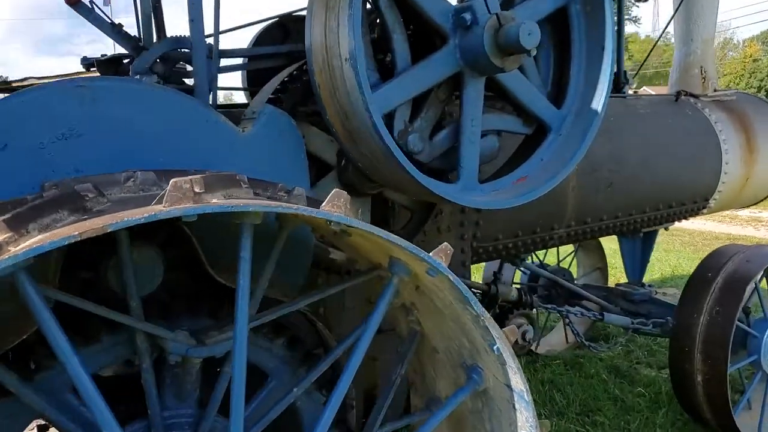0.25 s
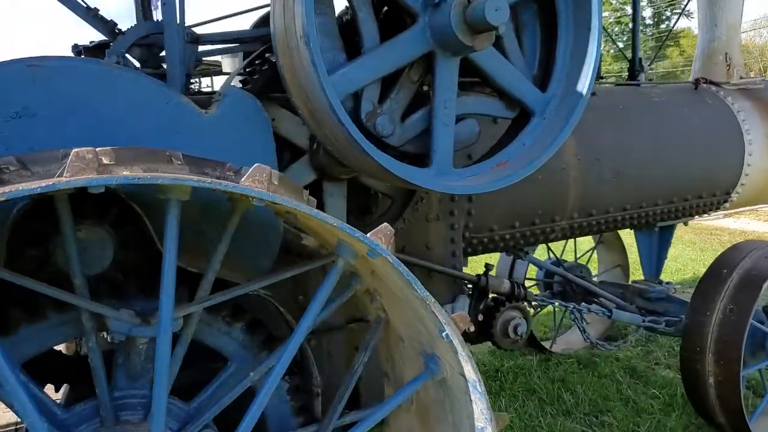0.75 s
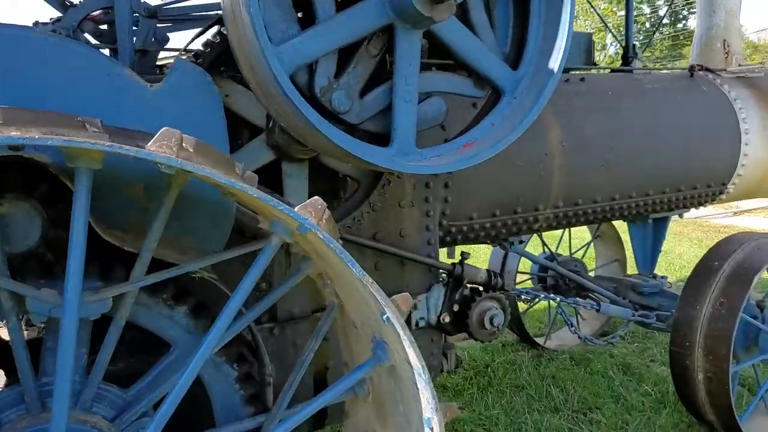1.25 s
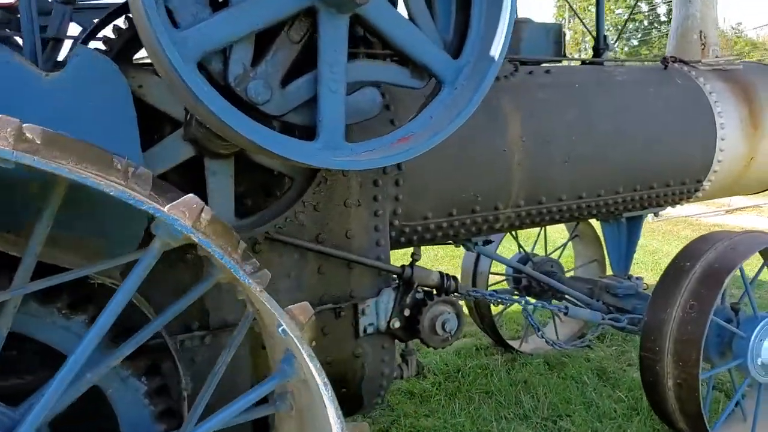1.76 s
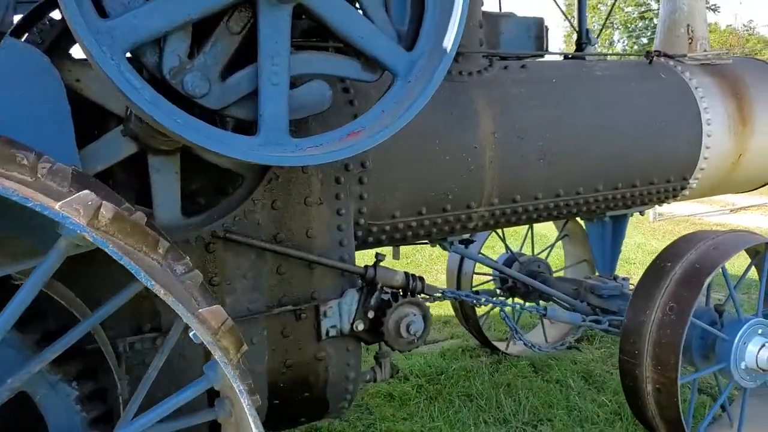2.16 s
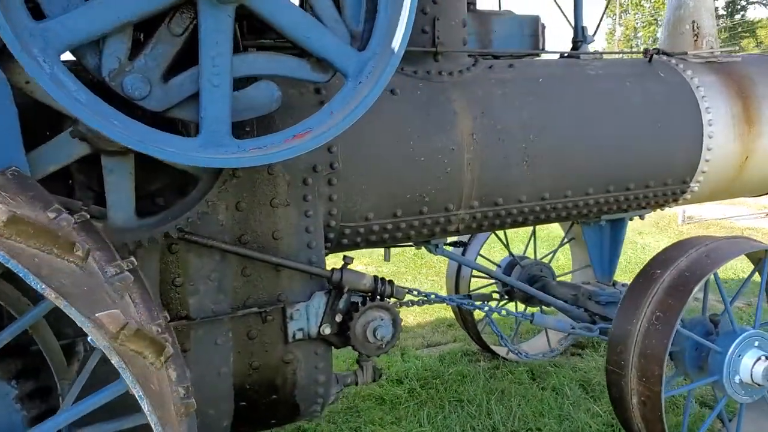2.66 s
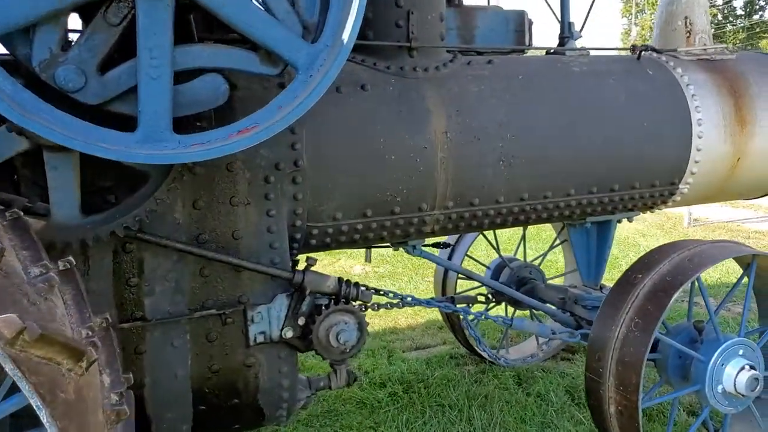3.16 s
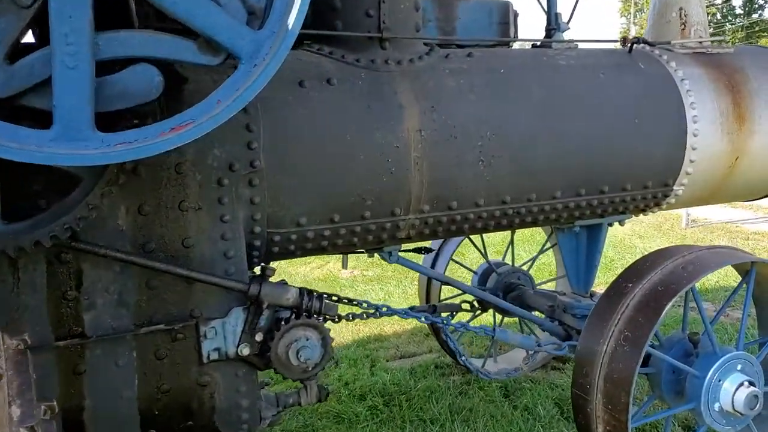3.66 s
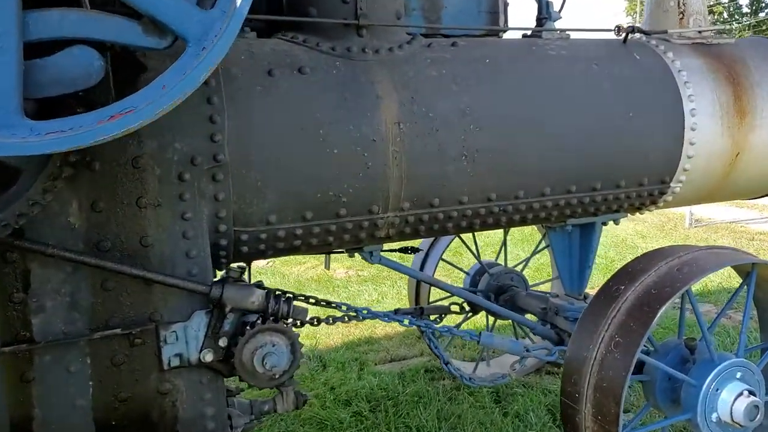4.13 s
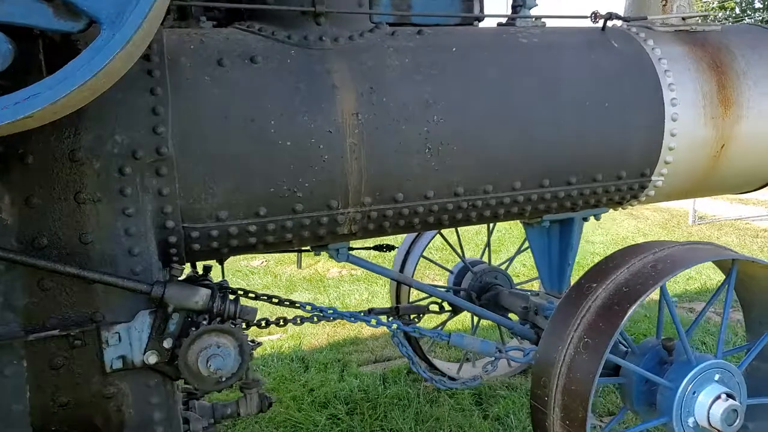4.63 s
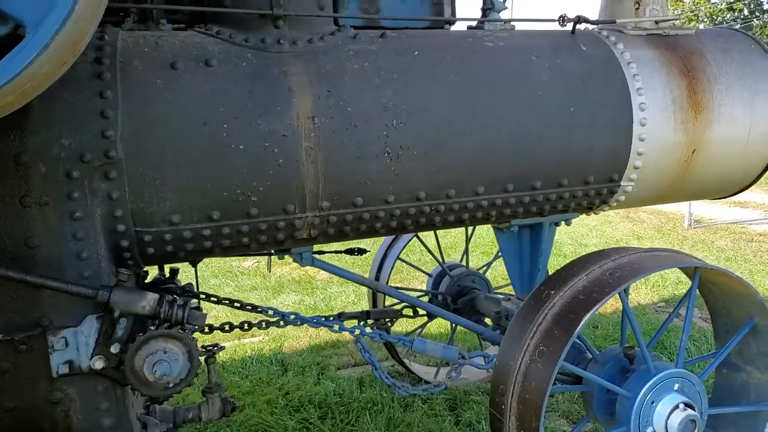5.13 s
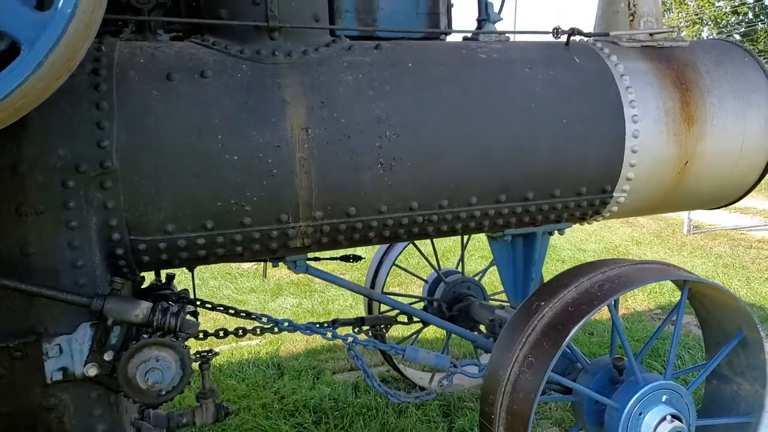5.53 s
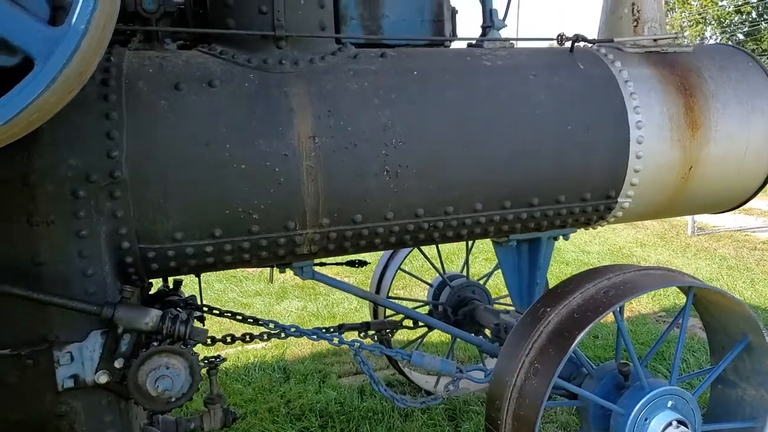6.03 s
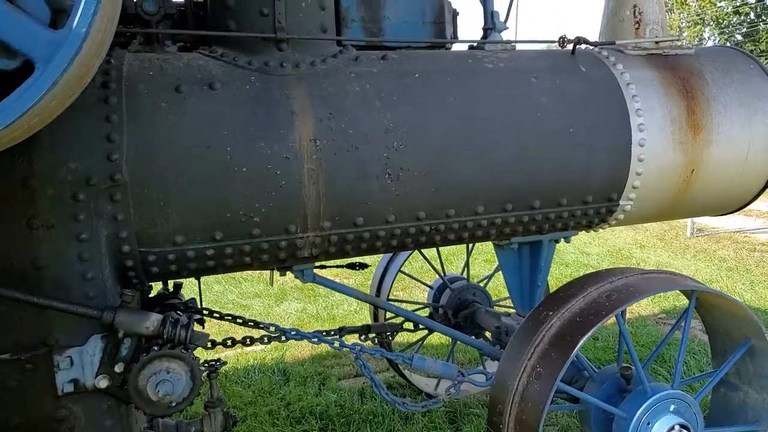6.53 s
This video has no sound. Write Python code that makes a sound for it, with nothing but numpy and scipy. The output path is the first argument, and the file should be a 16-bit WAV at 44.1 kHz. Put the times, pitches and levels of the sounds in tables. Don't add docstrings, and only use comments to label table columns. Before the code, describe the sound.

An open field in stereo, with a large twin-cylinder engine a little way off, near the centre. From 0 to 2 seconds it coasts, its deep uneven puffs slowing from about thirteen to ten cycles a second. On the left, small metal valves tick about eight times a second, dry hinge squeaks come near 0.2, 1.9, 3.7 and 5.5, and dull wooden knocks scatter until 2.0. Revs climb to a strong barking throb at 2.6, drop briefly at 2.9, surge again by 3.3, then ease slowly until 6.1 before a last climb to the end. From about 5 a cart closes from the right, its tyre roar peaking near 5.5 and brightening, with short wavering gear whines and stones snapping thickly after 6. Thin cricket chirps and high grasshopper scrapes lie over windy hiss and faint machinery murmur throughout.

```python
import sys
import numpy as np
from scipy import signal
from scipy.fft import rfft, irfft
from scipy.io import wavfile
from scipy.ndimage import uniform_filter1d

SR = 44100
rng = np.random.default_rng(int(sys.argv[2]) if len(sys.argv) > 2 else 0)


def materialize(psi):
    bounded = np.clip(np.atleast_2d(psi).T, -1, 1)
    quanta = np.round(bounded * 32767).astype(np.int16)
    wavfile.write(sys.argv[1], SR, quanta)


def voltage_ratio(level):
    return 10 ** (np.asarray(level, float) / 20)


N = 299439
EAR_LAG = 20


def curve(table):
    s, *columns = np.transpose(table)
    return [np.interp(np.arange(N) / SR, s, c, left=c[0], right=c[-1]) for c in columns]


def between(ends, share):
    return ends[0] + (ends[1] - ends[0]) * np.clip(share, 0, 1)


def unit(x):
    return x / np.sqrt(np.mean(x ** 2))


def steady(x):
    power = uniform_filter1d(uniform_filter1d(x ** 2, SR // 5), SR // 5)
    return x / np.sqrt(power)


def on_log(table, size):
    hz, value = np.transpose(table)
    return np.interp(np.log(np.arange(size // 2 + 1) * SR / size + 1), np.log(hz), value)


def colour(x, table):
    size = 2 ** 15
    cepstrum = irfft(np.log(voltage_ratio(on_log(table, size))))
    cepstrum[1:size // 2] *= 2
    cepstrum[size // 2 + 1:] = 0
    response = irfft(np.exp(rfft(cepstrum)))[:size // 4]
    return signal.fftconvolve(x, response)[:N]


def ring(x, hz, width):
    return signal.lfilter(*signal.iirpeak(min(hz, SR / 2.2), hz / width, SR), x)


def ring_twice(x, hz, width):
    return ring(ring(x, hz, width), hz, width)


def walk(rate):
    k = int(SR / rate)
    steps = np.repeat(rng.standard_normal(N // k + 1), k)
    return unit(uniform_filter1d(uniform_filter1d(steps, k), k)[:N])


def spikes(s, size):
    at = np.round(np.asarray(s) * SR).astype(int)
    return np.bincount(np.clip(at, 0, N - 1), size, N)


def swell(s, db, rise, fall):
    t = np.arange(int(8 * fall * SR)) / SR
    shape = (1 - np.exp(-t / rise)) * np.exp(-t / fall)
    return signal.fftconvolve(spikes(s, voltage_ratio(db)), shape / shape.max())[:N]


def burst(s, db, rise, fall):
    return swell(s, db, rise, fall) * rng.standard_normal(N)


def ports(x, pan_db, left, count=EAR_LAG):
    late = np.roll(x, count)
    return np.array([x, late] if left else [late, x]) * voltage_ratio(np.array([[pan_db], [-pan_db]]) / 2)


def flickering(table, own_db, shared_db):
    spectrum = rfft(colour(rng.standard_normal(N), table))
    octave = np.log2(np.arange(N // 2 + 1) * SR / N + 1)
    shared = shared_db * walk(6)
    out = 0
    for k in range(5, 15):
        band = irfft(spectrum * np.clip(1 - abs(octave - k), 0, 1), N)
        out = out + band * voltage_ratio(shared + own_db * walk(12))
    return unit(out)


# (frequency [Hz], level [dB])
EXHAUST_PIPE = [(20, -50), (40, -29), (58, 0.5), (80, 1), (110, 0), (135, -2.5), (165, -8), (210, -15.5),
                (240, -23.5), (290, -33.5), (400, -55), (700, -85)]


def through_pipe(pulses, size, f):
    late_s, late_hz, late_power = -.011, 220, 3.4
    turn_rad = 2 * np.pi * late_s * late_hz / late_power * np.minimum(f / late_hz, 2) ** late_power
    return irfft(rfft(pulses, size) * np.exp(-1j * turn_rad) * voltage_ratio(on_log(EXHAUST_PIPE, size)), size)[:N]


def pipe_drone(revs, cycles, climb, throttle, first_firing):
    drone_db = between((-9, -2), throttle) + between((0, -14), -climb / 15)
    drone = voltage_ratio(drone_db) * np.cos(2 * np.pi * 5 * (cycles - first_firing))
    since = (cycles - .067 + .5) % 1 - .5
    swing = np.cos(2 * np.pi * (12.5 * since + .85)) * 2 * np.cos(np.pi * since) ** 4
    return drone + voltage_ratio(between((-27.5, -9.5), (revs - 12) / 5.5)) * swing


# (time [s], cycles per second [Hz])
ENGINE_SPEED = [(0.0, 12.89), (0.17, 11.38), (0.8, 9.63), (1.36, 9.85), (1.5, 10.55), (1.77, 10.22),
                (2.14, 13.09), (2.47, 16.65), (2.64, 17.52), (2.91, 11.83), (3.27, 16.36), (4.02, 15.08),
                (4.37, 14.12), (4.82, 14.07), (5.68, 12.42), (6.07, 11.33), (6.53, 16.42), (6.79, 17.66)]
# (time [s], thump level [dB], throttle opening [0-1])
ENGINE_LOAD = [(0, -23, 0), (.2, -23.5, 0.2), (1.0, -26, 0), (1.3, -22, 0), (1.6, -22, 0.5),
               (2.0, -19, 0.1), (2.35, -16.5, 1), (2.68, -19.5, 0.6), (2.88, -24, 0.9), (3.05, -17, 0.43),
               (3.3, -16.5, 1), (3.55, -19.5, 1), (4.2, -19.5, 0.8), (4.95, -21.5, 1), (5.7, -22.5, 0.2),
               (6.05, -22.5, 0), (6.35, -17, 1), (6.79, -18, 0.8)]
# (share of the cycle [0-1], level [dB], sign [+1/-1])
PIPE_RETURNS = [
    (.2, -8.3, -1),
    (.655, -6.6, -1),
    (.755, -9, 1),
    (.801, -12.5, 1),
]
# (frequency [Hz], level [dB per Hz])
ROUGH_AIR_COLOUR = [(25, -50.5), (40, -11.5), (55, -10), (105, -6.5), (160, -12), (220, -19.5), (270, -41),
                    (400, -58.5)]
# (time [s], level against the puffs [dB])
ROUGH_AIR = [(0, 1), (1.15, 2), (1.4, -1), (2.0, -3), (2.3, -10), (2.6, -12), (2.68, 1), (2.9, 0),
             (3.0, -8), (3.2, -14), (4.1, -13), (4.8, -9), (5.1, -3), (5.6, -4), (6.0, -6), (6.79, -10)]
# (frequency [Hz], width [Hz], level [dB])
BARK_MODES = [
    (358, 41, -3.5),
    (410.5, 32, -5.5),
]
# (time [s], level against the puffs [dB])
TAILPIPE_RASP = [(0, -28), (2.0, -33), (2.5, -32), (2.8, -36.5), (3.9, -38), (4.2, -24.5), (4.9, -24.5),
                 (5.3, -31), (6.2, -30), (6.79, -35)]


def twin():
    first_firing, second_firing = .035, .404
    revs = curve(ENGINE_SPEED)[0]
    cycles = np.cumsum(revs) / SR
    thump_db, throttle = curve(ENGINE_LOAD)
    climb = uniform_filter1d(np.gradient(revs) * SR, SR // 10)
    growl_db = between((-6, -4.5), throttle) + 2.5 * np.tanh(climb / 8.6)
    growl_db = growl_db + between((0, 2), (13.4 - revs) / 2)
    bark_db = between((-38, -26.5), (revs - 12.7) / (15.8 - 12.7)) + between((0, -4), -climb / 20)
    turn = np.arange(int(cycles[-1]) + 1)
    chance = rng.standard_normal((120, 2, 6)).T
    cycles = cycles + .012 * np.interp(cycles, turn, chance[0, 0, turn])

    def fired(share, db, k, lag_s=0, sign=1):
        at = np.interp(turn + first_firing + share, cycles, np.arange(N) / SR)
        at = at + lag_s + .0002 * chance[k, 0, turn]
        return spikes(at, sign * voltage_ratio(db + 1.1 * chance[k, 1, turn]) * (at < (N - 2) / SR))

    waves = [(0, 0, 1), (second_firing, 1.2, 1)] + list(PIPE_RETURNS)
    pulses = sum(fired(share, db, k, 0, sign) for k, (share, db, sign) in enumerate(waves))
    size = N + SR - (N + SR) % 2
    f = np.arange(size // 2 + 1) * SR / size
    puffs = steady(through_pipe(pulses, size, f))
    drone = pipe_drone(revs, cycles, climb, throttle, first_firing)
    rough = voltage_ratio(curve(ROUGH_AIR)[0]) * unit(colour(rng.standard_normal(N), ROUGH_AIR_COLOUR))
    spectrum = rfft(puffs + drone + rough, size)
    low = 1 / (1 + (f / 100) ** 12)
    thump = steady(irfft(spectrum * low, size)[:N])
    growl = steady(irfft(spectrum * (1 - low), size)[:N]) * voltage_ratio(growl_db)
    bark_lag_s, echo_s = .002, .114
    barks = fired(0, 0, 0, bark_lag_s) + fired(second_firing, -2, 1, bark_lag_s + echo_s)
    bark = unit(sum(voltage_ratio(db) * ring(ring(barks, hz, width), hz, 2 * width) for hz, width, db in BARK_MODES))
    rasp_lag_s = -.004
    rasps = fired(0, 0, 2, rasp_lag_s) + fired(second_firing, -5, 3, rasp_lag_s)
    rasp = unit(ring_twice(rasps, 274, 53)) * voltage_ratio(curve(TAILPIPE_RASP)[0])
    out = thump + growl + bark * voltage_ratio(bark_db) + rasp
    return ports(out * voltage_ratio(thump_db), .5, False, count=11)


# (time [s], ticks counted)
VALVE_SHAFT = [(.0503, 0), (.6708, 5), (1.5395, 12), (2.2533, 18), (2.7142, 22), (3.4936, 29), (4.172, 35),
               (4.4008, 37), (5.231, 44), (5.8217, 49), (6.7475, 57)]
# (tick number, extra level [dB])
TICK_ACCENTS = [(0, -9), (1, -9), (2, -9), (3, -5), (4, -9), (5, 8.5), (6, 7.5), (7, 10), (9, 7.5),
                (10, 3.5), (11, 4.5), (15, 4.5), (22, 3), (24, -7), (26, 2), (28, -4), (29, 6), (30, 7),
                (31, 3.5), (34, 4.5), (35, 6.5), (36, 4), (38, -8), (40, -8), (42, -8), (46, 4), (47, 5),
                (44, 4), (48, 3), (49, 4.5), (56, 4)]
# (frequency [Hz], width [Hz], level [dB])
VALVE_BODY = [(2300, 1200, -13), (4400, 1000, -2), (5300, 1100, 0), (6600, 1000, -1.5)]


def valve_ticks():
    shaft_s, counted = np.transpose(VALVE_SHAFT)
    number = np.arange(counted[-1] + 1)
    s = np.interp(number, counted, shaft_s)
    which, extra_db = np.transpose(TICK_ACCENTS)
    db = -39 + 1.0 * rng.standard_normal(len(number))
    db = db + np.bincount(np.round(which).astype(int), extra_db, len(number))
    strike = burst(s, db, 0.0006, 0.0038)
    bounce = burst(s + 0.0067, db - 11, 0.0013, 0.009)
    loose_at, loose_size = rng.random((420, 2)).T
    chatter = burst(loose_at * N / SR, -47.5 - 2.4 * np.log(loose_size + .03), .0004, 0.0025)
    blow = strike + bounce + chatter
    return sum(voltage_ratio(db) * ring_twice(blow, hz, 1.03 * width) for hz, width, db in VALVE_BODY)


# (time [s], length [s], level [dB], pitch factor)
HINGE_SQUEAKS = [
    (.155, .036, -50, 1.0),
    (1.92, .06, -53, .95),
    (3.70, .04, -58, .98),
    (5.47, .04, -57, .98),
]
# (frequency [Hz], width [Hz], level [dB])
HINGE_TONES = [(3300, 200, -1), (4150, 200, -7), (5050, 220, -7), (8600, 300, -8), (9300, 400, -11)]
# (frequency [Hz], level [dB per Hz])
HINGE_RUB = [(800, -38), (2000, 8.5), (3000, 7.5), (5000, -6), (6500, -6), (9000, -3), (12000, -26),
             (15000, -17)]


def hinge_squeaks():
    out = 0
    for start, length, level_db, pitch in HINGE_SQUEAKS:
        first, count = int(start * SR), int(length * SR)
        gate = np.zeros(N)
        gate[first:first + count] = voltage_ratio(level_db) * np.hanning(count) ** .6
        rub = rng.standard_normal(N)
        tones = 0
        for hz, width, db in HINGE_TONES:
            tones = tones + voltage_ratio(db) * unit(ring(ring(rub, hz * pitch, width), hz * pitch, 4 * width))
        out = out + gate * (tones + voltage_ratio(1.5) * unit(colour(rub, HINGE_RUB)))
    return out


def machine():
    return ports(voltage_ratio(7.0) * valve_ticks(), 19.6, True) + ports(hinge_squeaks(), 34.7, True)


# (time [s], peak level [dB], left minus right [dB])
BRIGHT_EDGES = [(0.1645, -34, -1), (0.4658, -36, 2.0), (0.596, -36, -3), (0.674, -30, 5.5),
                (0.7946, -29, 7), (0.9188, -32, 6), (1.043, -33, 4.0), (1.1677, -40, 6), (1.293, -35, 3.5),
                (1.3329, -42, -3), (1.4152, -38, 3.5), (1.5379, -42, 1.5), (1.7784, -38, 3.0),
                (1.8986, -37, 2.5), (1.92, -28, 3.5), (2.0183, -35, 1.5), (2.0822, -46, -1.0),
                (2.1131, -45, 0.5), (2.1355, -42, 2.0), (2.1894, -34, -5), (2.2598, -46, -1.0),
                (2.367, -40, 10), (2.4833, -33, 4.0), (2.601, -54, 1.0), (2.6983, -39, -8),
                (2.9821, -42, 0.0), (3.0505, -33, 2.5), (3.1632, -29, 6), (3.275, -34, 1.5),
                (3.3857, -33, 6), (3.497, -33, 6), (3.6072, -31, 7), (3.7244, -30, 1.5), (3.9305, -32, 4.0),
                (4.0033, -27, 5.0), (4.058, -27, 4.0), (4.1739, -35, 11), (4.2877, -32, 2.0),
                (4.5341, -41, -0.5), (4.8743, -36, 1.0), (5.1452, -31, 0.0), (5.231, -32, 5),
                (5.3482, -39, 1.5), (5.468, -40, 2.0), (5.5867, -24, 4.0), (5.7029, -31, 4),
                (5.8202, -32, 0.0), (6.0536, -35, 1.5), (6.2292, -44, -6), (6.2736, -33, -5),
                (6.3061, -38, -3), (6.347, -37, -3.0), (6.4827, -37, -1), (6.546, -42, -0.5),
                (6.57, -42, -2.0), (6.6074, -35, 0.0), (6.6672, -35, -2.0), (6.6907, -45, -1.0),
                (6.7271, -41, -1.0), (6.7511, -33, -2.5)]


def clicks():
    s, db, pan_db = np.transpose(BRIGHT_EDGES)
    db = -4.5 + 10 * np.log10(np.maximum(voltage_ratio(2 * db) - voltage_ratio(2 * -51), 1e-6))
    air = rng.standard_normal(N)
    left, right = (swell(s, db + way * pan_db / 2, .0008, .004) * air for way in (1, -1))
    return ring_twice(np.array([left, np.roll(right, EAR_LAG)]), 9400, 6500)


# (time [s], distance [m])
CART_DISTANCE = [
    (0, 60),
    (2.8, 24.5),
    (3.5, 21.3),
    (4.7, 20),
    (5.25, 12.2),
    (5.5, 8.7),
    (5.9, 15),
    (6.2, 11.6),
    (6.5, 15),
    (6.79, 15),
]
# (frequency [Hz], level [dB per Hz])
TYRE_COLOUR = [(500, -3.5), (950, 0), (1300, 6), (2300, 5), (3000, 8), (4000, -12), (7000, -4.5),
               (12300, -18), (15500, -26)]
# (time [s], peak level [dB], frequency [Hz])
STONE_SNAPS = [(2.649, -37, 5850), (3.8329, -46, 6900), (3.9462, -40, 6380), (4.5738, -41, 6200),
               (5.6383, -34, 4100), (6.0524, -36.5, 6800), (6.1078, -39, 6300), (6.1696, -43, 6400),
               (6.1926, -39, 4100), (6.2277, -34.5, 6200), (6.2854, -40, 6690), (6.3036, -40, 6280),
               (6.3473, -36.5, 6800), (6.4156, -42, 6500), (6.4817, -40, 7110), (6.5433, -41, 7200),
               (6.5879, -34.5, 5700), (6.6899, -33.5, 6600), (6.7266, -33, 6420), (6.75, -34.5, 6400),
               (6.7854, -38, 6430)]


def cart():
    level_db = -18.5 - 20 * np.log10(curve(CART_DISTANCE)[0])
    turns_s, takes_s = 5.66, 0.26
    treble_db = between((-33, 5.5), .5 + (np.arange(N) / SR - turns_s) / takes_s / 2)
    stones = sum(ring_twice(burst([s], [db + 14.0], 0.0014, 0.004), hz, 1600) for s, db, hz in STONE_SNAPS)
    roar = flickering(TYRE_COLOUR, 1.2, 0.5)
    grain_at, grain_size = rng.random((3000, 2)).T
    crunch = burst(grain_at * N / SR, -8.5 * np.log(grain_size + .06), .0005, .003)
    roar = roar + voltage_ratio(-3.5) * unit(ring_twice(crunch, 2550, 2000))
    roar = roar + voltage_ratio(treble_db) * voltage_ratio(1.1 * walk(7)) * ring(roar, 3440, 700)
    return ports(roar * voltage_ratio(level_db), 1.0, False) + ports(stones, -2.9, False) + whine()


# (time [s], length [s], starting frequency [Hz], level [dB])
GEAR_STRANDS = [(5.05, .24, 600, -55), (5.33, .09, 572, -55), (5.6, .14, 668, -54), (5.25, .12, 660, -56),
                (5.5, .2, 630, -55), (5.76, .36, 562, -57), (5.97, .2, 655, -53), (6.12, .26, 655, -57),
                (6.15, .16, 900, -56), (6.3, .1, 575, -51), (6.36, .27, 664, -50), (6.55, .24, 680, -54),
                (6.6, .19, 915, -61)]


def whine():
    climb_hz_per_s, waver_hz, flicker_db = 70, 4, 2.0
    t, out = np.arange(N) / SR, 0
    for s, length, hz, db in GEAR_STRANDS:
        done = np.clip((t - s) / length, 0, 1)
        pitch = hz + climb_hz_per_s * length * done + waver_hz * walk(29)
        level = np.sin(np.pi * done) ** .5 * voltage_ratio(db + 3 + flicker_db * walk(13))
        out = out + level * np.sin(2 * np.pi * np.cumsum(pitch) / SR)
    return 2 ** .5 * out


def phrases(table, rest_db):
    edge_s = .012
    s, length, db = np.transpose(table)
    steps = spikes(s, db - rest_db) - spikes(s + length, db - rest_db)
    return rest_db + uniform_filter1d(np.cumsum(steps), int(2 * edge_s * SR))


def sing(hz, width, gate):
    return unit(ring_twice(gate * rng.standard_normal(N), hz, width))


# (time [s], length [s], level [dB])
CRICKET_CHIRPS = [(0, .08, -45), (.855, .04, -48), (1.43, .03, -49), (1.52, .06, -51), (2.42, .07, -49),
                  (2.6, .03, -48), (2.65, .03, -45), (2.77, .05, -45), (3.1, .07, -50), (3.41, .04, -43),
                  (3.51, .03, -47), (3.6, .04, -46), (3.67, .07, -43), (4.19, .05, -50), (4.4, .03, -49),
                  (4.57, .03, -46), (4.69, .03, -50), (4.82, .03, -47), (5.03, .04, -44), (5.11, .05, -50),
                  (5.63, .04, -44), (5.82, .03, -51), (6.2, .06, -49), (6.35, .04, -49), (6.59, .07, -44),
                  (6.7, .03, -49)]
# (time [s], length [s], level [dB])
HIGH_GRASSHOPPER = [(.08, .03, -56), (.68, .04, -54), (.79, .06, -46), (.91, .05, -55), (1.05, .05, -52),
                    (1.26, .07, -51), (1.36, .17, -55), (1.85, .1, -51), (2.02, .1, -57), (2.2, .3, -58),
                    (2.72, .14, -58), (2.89, .05, -54), (3.11, .22, -51), (3.51, .13, -52),
                    (3.72, .13, -50), (4.0, .06, -45), (4.07, .13, -52), (4.24, .1, -53), (4.37, .08, -56),
                    (4.83, .07, -56), (5.08, .07, -49), (5.29, .07, -55), (5.4, .07, -52), (5.86, .04, -55),
                    (6.18, .2, -52), (6.51, .05, -56)]
# (time [s], length [s], level [dB])
LOW_GRASSHOPPER = [(.1, .08, -46), (.36, .05, -50), (.68, .04, -46), (.8, .05, -47), (1.0, .1, -50),
                   (1.32, .2, -49), (1.9, .05, -49), (2.19, .22, -46), (2.9, .45, -47), (3.47, .1, -46),
                   (3.7, .1, -47), (4.0, .1, -47), (4.28, .16, -47), (5.05, .11, -46), (5.33, .1, -46),
                   (5.82, .08, -46), (5.95, .3, -50), (6.3, .06, -46), (6.45, .3, -49)]
# (time [s], level [dB])
FAR_CHORUS = [
    (0, -57),
    (1.8, -55.5),
    (2.5, -56.5),
    (4.7, -49),
    (6.79, -50),
]


def insects():
    high_db = phrases(HIGH_GRASSHOPPER, -63) - 2
    low_db = phrases(LOW_GRASSHOPPER, -57) - 6.5
    cricket_db = phrases(CRICKET_CHIRPS, -59) + 3
    stroke_hz = 125 + 10 * walk(12)
    stroke = (1.2 + 0.35 * np.sin(2 * np.pi * np.cumsum(stroke_hz) / SR)) ** 2
    high = sing(13500, 380, stroke * voltage_ratio(3.4 * walk(34))) * voltage_ratio(high_db)
    low = sing(6710, 170, voltage_ratio(2.5 * walk(50))) * voltage_ratio(low_db)
    cricket = sing(5660, 110, voltage_ratio(2.8 * walk(60))) * voltage_ratio(cricket_db)
    chorus_db = curve(FAR_CHORUS)[0] + np.array([[-6.0], [1.5]])
    chorus = np.array([sing(13500, 1500, 1), sing(12220, 2100, 1)]) * voltage_ratio(chorus_db)
    return ports(cricket + high + low, 7.0, True) + chorus


# (time [s], peak level [dB], frequency [Hz])
WOODEN_KNOCKS = [
    (0.094, -35, 885),
    (0.528, -34, 815),
    (0.592, -38, 785),
    (0.74, -52, 716),
    (1.036, -38, 827),
    (1.225, -36, 1197),
    (1.343, -40, 824),
    (1.936, -35, 856),
    (2.028, -37, 1026),
]


def knocks():
    out = 0
    for s, db, hz in WOODEN_KNOCKS:
        out = out + ring_twice(burst([s], [db + 11], .004, .014), hz, 550)
    return ports(out, 14.0, True)


# (time [s], murmur level [dB])
FAR_MACHINERY = [
    (0, -48),
    (.62, -51),
    (.9, -53),
    (1.3, -55),
    (2.1, -55),
    (2.5, -60.5),
    (4.85, -58.5),
    (5.4, -49),
    (6.79, -58.5),
]
# (time [s], level [dB])
WIND = [
    (0, -3),
    (.5, -2.5),
    (1.3, 0.5),
    (2.3, -0.5),
    (3.1, -0.5),
    (4.3, -1.5),
    (5.4, -0.5),
    (6.79, 1.5),
]
# (frequency [Hz], level [dB per Hz])
FIELD_COLOUR = [(130, -22.5), (220, -3.5), (280, -11.5), (480, -14), (1000, -14.5), (1300, -20),
                (2300, -20.5), (3300, -18), (4200, -21.5), (5300, -23.5), (6900, -24), (7800, -33.5),
                (10500, -33), (12000, -38.5), (15600, -36)]
# (frequency [Hz], share arriving from the left [0-1])
SHARE_FROM_LEFT = [(200, 0.93), (400, 0.59), (1000, 0.15), (3000, 0.34), (7000, 0.5), (15000, 0)]


def field():
    murmur_db = curve(FAR_MACHINERY)[0]
    hiss_db = -47 + curve(WIND)[0] + 0.27 * (murmur_db - murmur_db.mean())
    size = N - N % 2
    alike = np.clip(on_log(SHARE_FROM_LEFT, size), 0, 1)
    left, a, b = (rfft(flickering(FIELD_COLOUR, 1.0, 1.0), size) for _ in range(3))
    from_left = ports(irfft(left * alike ** .5, N), 3.8, True)
    around = irfft(np.array([a, b]) * (1 - alike) ** .5, N)
    murmur = ring(ring(rng.standard_normal(N), 980, 1400), 980, 1170)
    murmur = unit(murmur * voltage_ratio(0.28 * walk(2.3) + 2.0 * walk(18)))
    return (from_left + around) * voltage_ratio(hiss_db + 10.0) + ports(murmur * voltage_ratio(murmur_db + 3.0), 14.1, True)


def scene():
    return twin() + machine() + clicks() + cart() + insects() + knocks() + field()


def roll_off(x):
    return signal.sosfilt(signal.butter(12, 15710, fs=SR, output="sos"), x)


def record(dry):
    dry = signal.sosfilt(signal.butter(2, 29, "high", fs=SR, output="sos"), dry)
    dry = signal.sosfilt(signal.ellip(8, .2, 70, 15550, fs=SR, output="sos"), dry)
    return roll_off(dry)


dry = scene()
out = record(dry)
materialize(out)
```